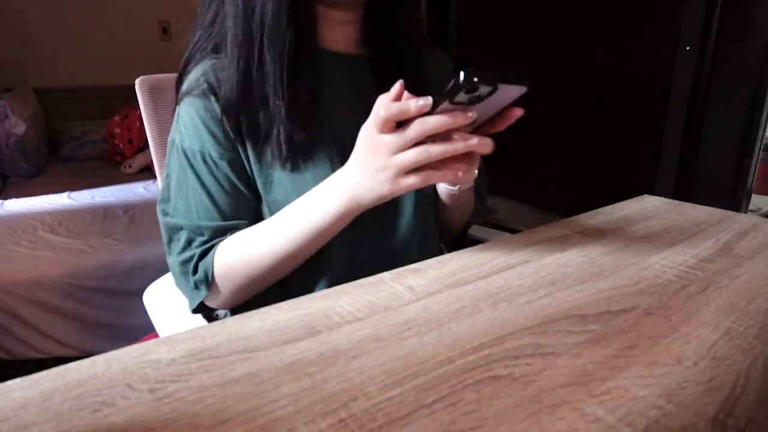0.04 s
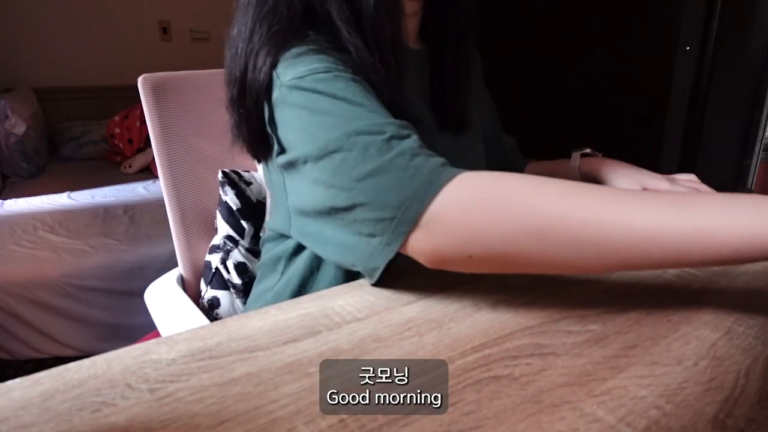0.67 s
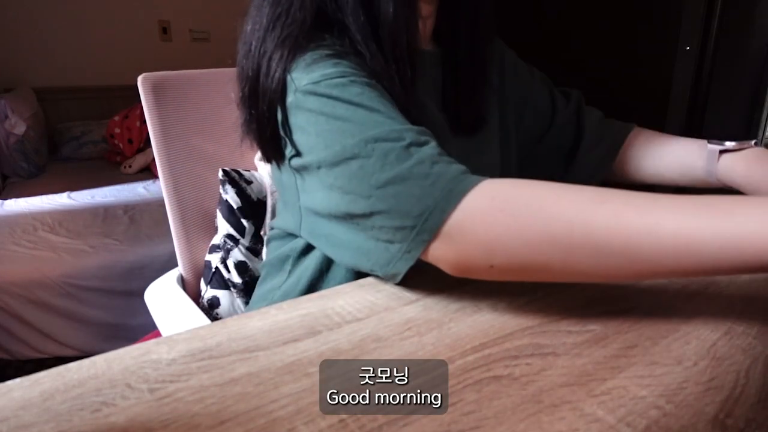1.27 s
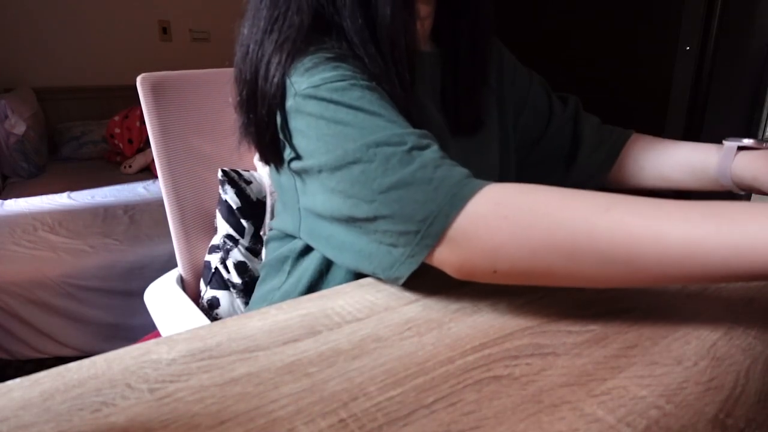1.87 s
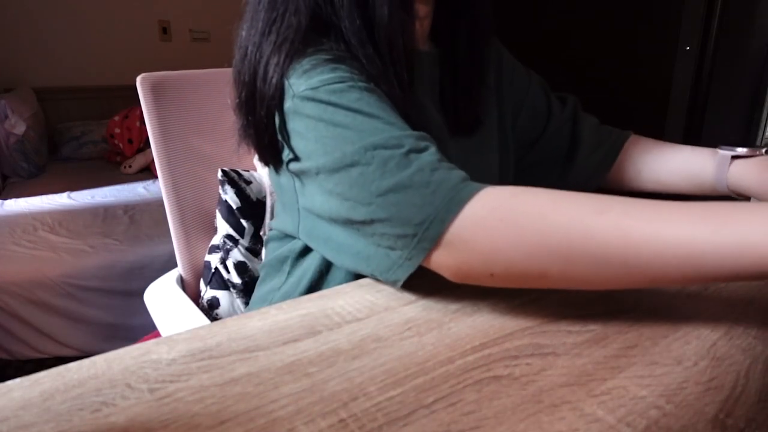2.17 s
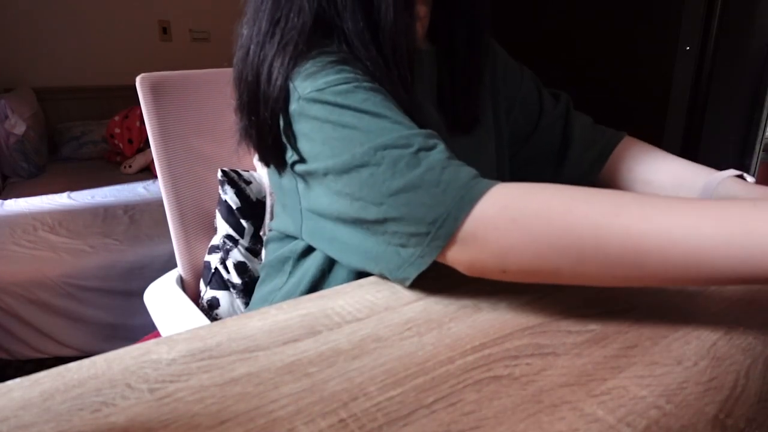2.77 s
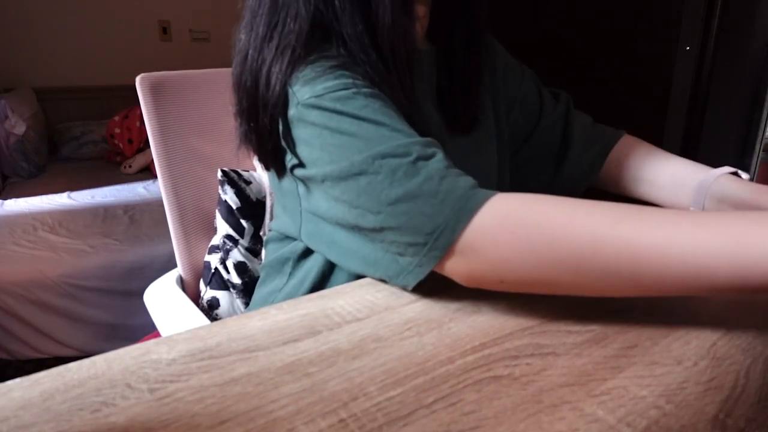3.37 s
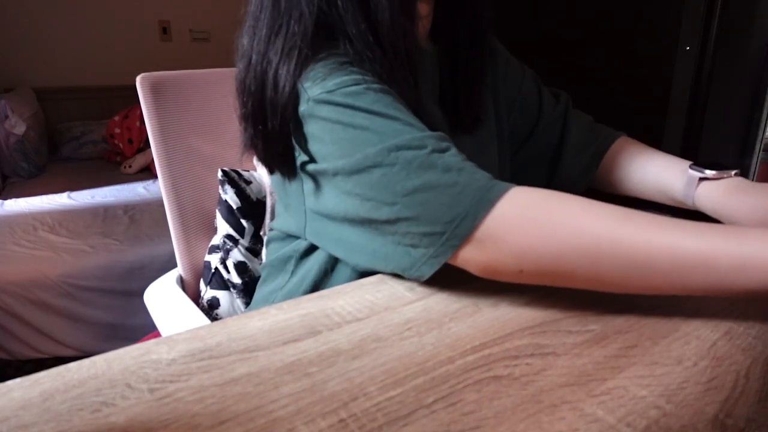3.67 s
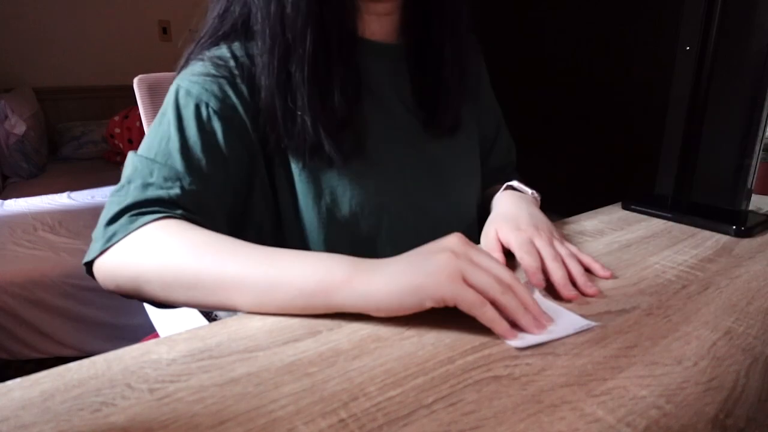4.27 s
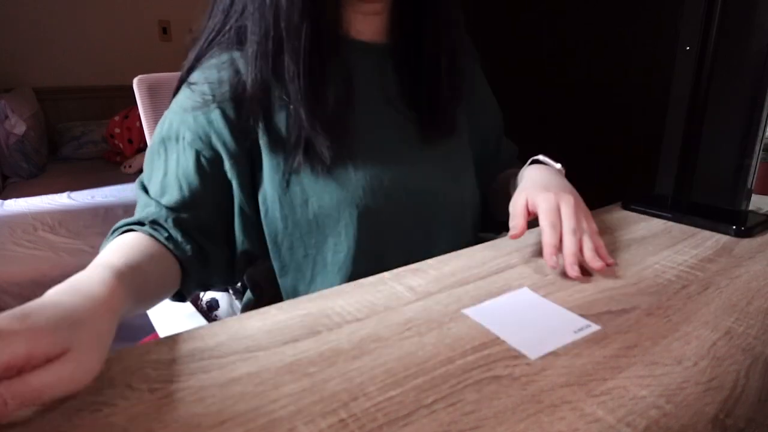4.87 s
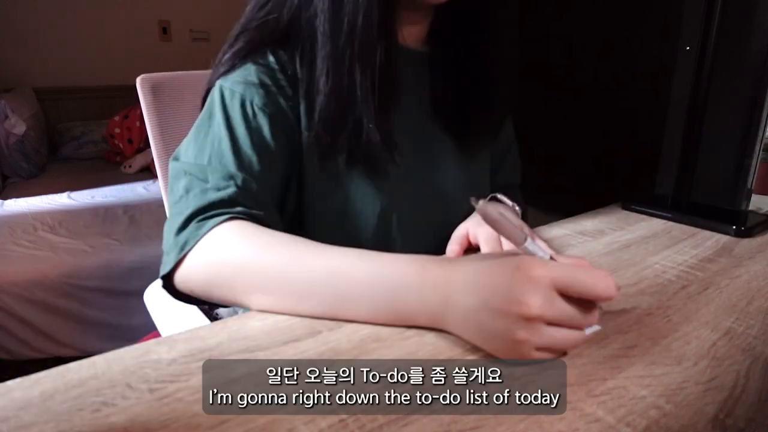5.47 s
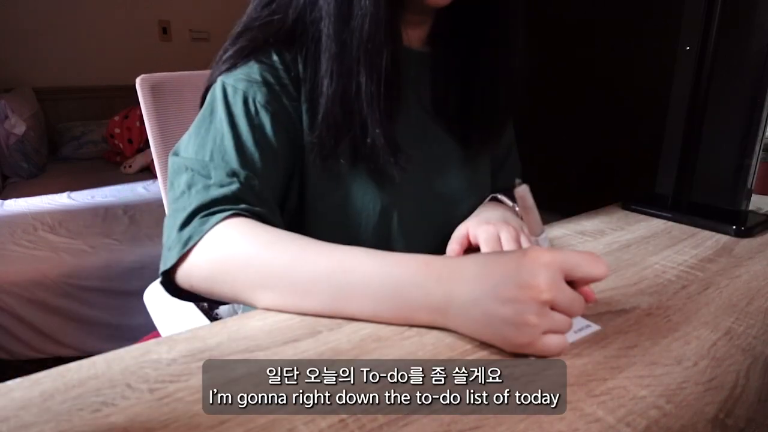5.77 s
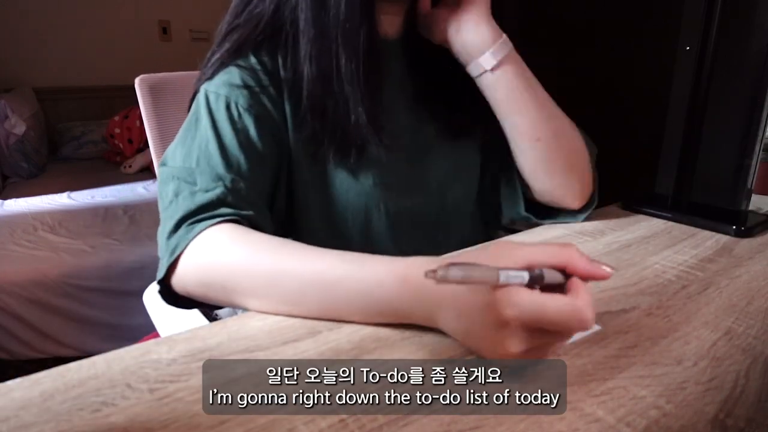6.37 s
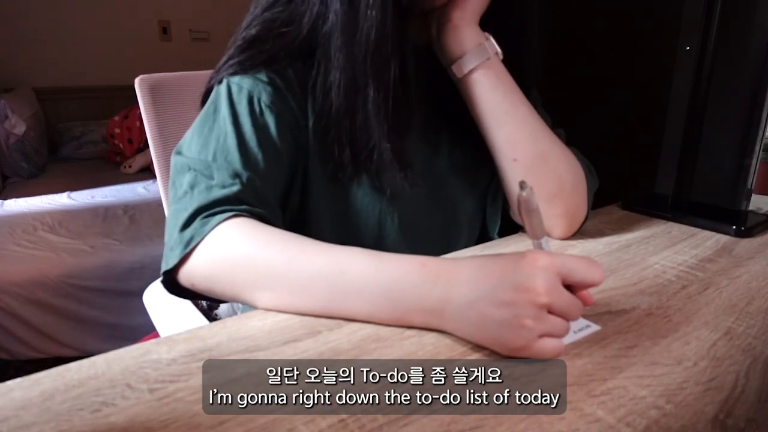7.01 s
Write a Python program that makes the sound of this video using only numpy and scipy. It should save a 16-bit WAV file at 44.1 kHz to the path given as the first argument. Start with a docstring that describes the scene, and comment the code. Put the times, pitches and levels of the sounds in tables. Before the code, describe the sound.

Close, quiet desk sounds: a phone set down, a sticky note peeled and smoothed flat, and a pen clicked, over rustling sleeves.

```python
"""A small quiet room: hands at a wooden desk, close to a stereo microphone with a little hiss.
A phone is put down, its case clicking and the board ringing under it. A sticky note is thumbed loose,
peeled off its pad as the glue lets go in tugs, slapped onto the desk and smoothed flat; its fibres
catch and slip and the sheet resonates. A pen clatters as it is picked up, then is clicked.
Sleeves rustle softly throughout, and a few faint thin tones come and go."""
import sys
import numpy as np
from scipy import signal
from scipy.fft import rfft, irfft, next_fast_len
from scipy.io import wavfile

SR = 44100
rng = np.random.default_rng(int(sys.argv[2]) if len(sys.argv) > 2 else 0)


def pcm_store(signal):
    """Save signal as 16-bit PCM."""
    levels = np.round(np.clip(np.atleast_2d(signal), -1, 1) * 32767)
    wavfile.write(sys.argv[1], SR, levels.astype(np.int16).T)


N = 319493
TIME = np.arange(N) / SR
SHORT = TIME[:8192]   # time axis of a one-shot

# colour of a hard edge hitting wood: f/Hz, level/dB
CRACK_COLOUR = [(100, -45), (600, -34), (1500, -10.5), (2500, -1.5), (4500, -2.5), (6000, -4),
                (11000, -7.5), (16000, -18.5)]
# the pen on the wood, a light rub and then clattering: t/s, level/dB
PEN_TOUCHES = [(4.827, -46), (4.8364, -28.5), (4.868, -42), (4.8738, -48), (4.8963, -31.5), (4.8996, -27.5)]
# the glue letting go in tugs: t/s, level/dB, length/s, sheet resonance/Hz
GLUE_TUGS = [(3.4467, -47, 0.02, 4700), (3.548, -44, 0.0067, 8500), (3.6615, -31, 0.00079, 7150),
             (3.699, -39.5, 0.004, 9600), (3.7075, -37, 0.0015, 4120), (3.712, -40.5, 0.0073, 3800),
             (3.7418, -39, 0.0012, 2680), (3.776, -35.5, 0.0095, 7340), (3.787, -44, 0.0067, 3900),
             (3.816, -33, 0.0061, 4800), (3.8315, -27, 0.0042, 4420), (3.8795, -33.5, 0.0135, 3900),
             (3.963, -48, .007, 4230)]


def from_db(db):
    return 10 ** (np.asarray(db) / 20)


def rms_one(x):
    return x / np.sqrt(np.mean(x ** 2) + 1e-20)


def in_time(rows):
    return np.interp(TIME, *np.transpose(rows))


def at_hz(points, hz):
    points_hz, values = np.transpose(points)
    return np.interp(np.log(hz + 1), np.log(points_hz), values)


def add(track, s, sound):
    """Mix a sound in at a given time."""
    start = max(round(s * SR), 0)
    track[start:start + len(sound)] += sound[:N - start]


def swell(start, end):
    """A smooth rise and fall."""
    return np.sin(np.linspace(0, np.pi, max(round((end - start) * SR), 8)))


def wander(per_s, count):
    """Random values joined by straight lines."""
    steps = rng.standard_normal(1024)
    return np.interp(TIME[:count] * per_s, np.arange(len(steps)), steps)


def filtered(x, order, hz, kind="low"):
    """A Butterworth low-, high- or band-pass."""
    return signal.sosfilt(signal.butter(order, hz, kind, fs=SR, output="sos"), x + 1e-18)


def resonance(x, hz, width_hz):
    """One resonance, unity gain at its peak."""
    r = np.exp(-np.pi * width_hz / SR)
    return signal.lfilter([1, 0, -1], [1, -2 * r * np.cos(2 * np.pi * hz / SR), r * r], x) * (1 - r * r) / 2


def coloured(x, colour, tilt_db=0, hinge_hz=1500):
    """Minimum-phase EQ with a tilt per octave above the hinge; white noise keeps its level."""
    size = 4096
    hz = np.arange(size // 2 + 1) * SR / size
    curve_db = at_hz(colour, hz) + tilt_db * np.log2(np.maximum(hz, hinge_hz))
    cepstrum = irfft(np.log(rms_one(from_db(curve_db))))
    cepstrum[1:size // 2] *= 2   # folded forward, so nothing rings ahead of an attack
    cepstrum[size // 2 + 1:] = 0
    return signal.fftconvolve(x, irfft(np.exp(rfft(cepstrum))))[:len(x)]


def diffuse(mid, side):
    """Sound from all around: two close capsules differ mainly in the treble."""
    # stereo width: f/Hz, side minus mid/dB
    width = [(400, -21), (1000, -11), (3000, -11), (8000, -7), (16000, -6.5)]
    size = next_fast_len(len(side))
    hz = np.arange(size // 2 + 1) * SR / size
    side = irfft(rfft(side, size) * from_db(at_hz(width, hz)), size)[:len(mid)]
    return np.array([mid + side, mid - side])


def tones(rows, width_hz):
    """Narrow bands of noise: wavering tones that fade in and out."""
    out = np.zeros(N)
    for start, end, hz, level_db in rows:
        fade = swell(start, end)
        tone = resonance(rng.standard_normal(SR), hz, width_hz)[-len(fade):]
        add(out, start, from_db(level_db) * rms_one(tone) * fade)
    return out


def burst(t60):
    """A dense wash of vibrations that dies away."""
    fade = np.exp(-np.log(1000) * SHORT / t60)
    wash = rng.standard_normal(len(SHORT)) * fade
    return wash * np.linalg.norm(fade) / np.linalg.norm(wash)


def struck(modes, scatter_db=1.0):
    """Decaying modes, with new strengths at every blow."""
    hz, level_db, t60 = np.transpose(modes)[:, :, None]
    strengths = from_db(level_db + scatter_db * rng.standard_normal(hz.shape))
    strengths *= rng.choice([-1, 1], hz.shape)
    fades = np.exp(-np.log(1000) * SHORT / t60)
    return np.sum(strengths * np.sin(2 * np.pi * hz * SHORT) * fades, axis=0)


def touch(spread_s, sharpness):
    """One hard contact: a sharp first touch and a dying chatter of tiny ones, even in colour."""
    lags = np.round(rng.uniform(.15, 1, (3, 1)) * spread_s * SR) + 1
    delays = np.exp(-2j * np.pi * lags * np.arange(len(SHORT) // 2 + 1) / len(SHORT))
    allpasses = (sharpness + delays) / (1 + sharpness * delays)
    return irfft(np.prod(allpasses, axis=0)) * np.sqrt(spread_s * SR / 2)


def hiss(level_db=-67):
    """The microphone's steady noise floor."""
    # colour of the hiss: f/Hz, level/dB
    colour = [(30, -62), (80, -28), (300, -10.5), (1000, -9), (1500, -14), (1900, -1), (3200, -6),
              (5000, -8.5), (7500, -12.5), (9500, -12), (16000, -21)]
    return from_db(level_db) * diffuse(*[coloured(noise, colour) for noise in rng.standard_normal((2, N))])


def faint_tones():
    """Thin tones come and go in the background."""
    # each tone: start/s, end/s, f/Hz, level/dB
    whines = [(0, .42, 5320, -66.5), (.68, 1.32, 3582, -62), (2.0, 2.6, 760, -75.5),
              (7.05, 7.352, 3950, -66)]
    return tones(whines, width_hz=13)


def room(x, gap_s=0.00049, build_s=0.0014):
    """Dense reflections of a small furnished room; the bass lingers longest."""
    # reverb time: f/Hz, T60/s
    decay = [(200, 0.39), (1000, 0.13), (4000, 0.22), (14000, 0.22)]
    edges_hz = np.geomspace(80, 18000, 9)
    t = TIME[:SR // 2]
    tail = np.zeros((2, len(t)))
    for low, high in zip(edges_hz, edges_hz[1:]):
        band = filtered(rng.standard_normal(tail.shape), 2, [low, high], "band")
        tail += band * np.exp(-np.log(1000) * t / at_hz(decay, np.sqrt(low * high)))
    tail *= 1 - np.exp(-np.maximum(t - gap_s, 0) / build_s)
    return signal.fftconvolve(x[None], diffuse(*tail) / np.linalg.norm(tail[0]), axes=1)[:, :N]


def sleeves(catches_per_s=60, crackle_db=-13, swish_db=-2, swells_per_s=5):
    """Cloth brushes along the arms, its colour shifting with the folds; now and then a thread catches."""
    # cloth moving with the arms: t/s, level/dB
    movement = [(0.0, -59.5), (.45, -57.5), (.85, -60), (1.83, -61), (2.2, -59), (2.66, -57.5),
                (3.34, -62.5), (3.61, -57.5), (3.77, -53.5), (3.97, -60.5), (4.36, -62), (5.46, -62),
                (5.68, -66), (6.55, -61.5), (7.24, -63.5)]
    # colour of rubbing cloth: f/Hz, level/dB
    cloth = [(100, -34.5), (400, -10), (1450, -21.5), (2000, -7), (3100, 3.5), (4500, -1.5), (16000, -16.5)]
    catches = (rng.random((2, N)) < catches_per_s / SR) * rng.standard_normal((2, N))
    brush = rng.standard_normal((2, N)) + from_db(crackle_db) * rms_one(catches)
    folds = rng.standard_normal((2, N))
    for hz in np.geomspace(2200, 9000, 12):
        brush += from_db(swish_db) * wander(swells_per_s, N) * resonance(folds, hz, width_hz=hz / 12)
    return from_db(in_time(movement)) * diffuse(*[rms_one(coloured(noise, cloth)) for noise in brush])


def board(cut_hz, build_s=0.00052, thud_hz=222, thud_width_hz=150):
    """A blow rings the desk's main modes, a wash of lesser ones and a thud; flesh reaches only the lows."""
    # main modes of the desk top: f/Hz, level/dB, T60/s
    modes = [(430.6, -7.5, 0.051), (471, -3, 0.058), (664, -3, 0.031), (784, 8, 0.018), (890, -0.5, 0.026),
             (1080, -5, 0.059), (1246, 1, 0.041), (1626, -6, 0.053), (1799, -7, 0.13), (2430, -4.5, 0.075),
             (2570, 10.5, 0.023), (3260, 6.5, 0.04)]
    # colour of its lesser modes: f/Hz, level/dB
    wood = [(60, -23), (160, -22), (240, -9), (350, -37), (460, -20), (550, -13), (660, -2), (1200, -9),
            (1450, -12), (1900, 9), (2800, 1), (5000, 9.5), (16000, -40)]
    wash = burst(t60=.085)
    ring = from_db(-2.5) * struck(modes) + from_db(3) * coloured(wash, wood)
    ring *= 1 - np.exp(-SHORT / build_s)   # bending waves take time to spread
    ring = filtered(ring, 2, thud_hz, "high")
    thud = resonance(resonance(wash, thud_hz, thud_width_hz), thud_hz, thud_width_hz)
    thud *= from_db(5) * (thud_hz / max(cut_hz, thud_hz)) ** 3   # the longer the push, the more it thuds
    return filtered(ring + thud, 4, cut_hz)


def knocks():
    """Phone, fingers and arms land on the desk and ring the board; a hard edge adds a crack."""
    # landings: t/s, wood/dB, contact cut-off/Hz (low for flesh, high for a hard edge), crack/dB
    blows = [(.44, -58, 1270, -37), (0.513, -46, 220, -75), (0.554, -40.5, 265, -41.5),
             (0.6747, -29.5, 2680, -17), (.749, -42, 520, -44), (2.749, -63, 1190, -43),
             (3.59, -41, 980, -65), (4.129, -51, 510, -76), (4.902, -40, 470, -68), (6.72, -51, 430, -73)]
    out = np.zeros(N)
    for s, wood_db, cut_hz, crack_db in blows:
        body = from_db(wood_db) * board(cut_hz)
        crack = from_db(crack_db) * coloured(touch(0.00081, sharpness=0.93), CRACK_COLOUR)
        add(out, s, body + crack)
    return out


def jolts(rows, cut_hz, passed_db=-25):
    """Whatever lies on the desk passes a share of each jolt to the board."""
    out = np.zeros(N)
    for s, level_db, *_ in rows:
        add(out, s, from_db(level_db + passed_db) * board(cut_hz))
    return out


def plastic_taps(rows, spread_s, gain_db):
    """Brief contacts on small, well damped plastic; each spot has a resonance of its own."""
    # colour of tapped plastic: f/Hz, level/dB
    plastic = [(100, -58), (1400, -31), (2500, -10.5), (4000, -5.5), (10200, -2.5), (11500, -4.5),
               (16000, -12.5)]
    out = np.zeros(N)
    for s, level_db, tilt_db in rows:
        contact = coloured(touch(spread_s, sharpness=0.75), plastic, tilt_db)
        ring = 2.2 * resonance(contact, hz=rng.uniform(3300, 10500), width_hz=600)
        add(out, s, from_db(level_db + gain_db) * (contact + ring))
    return out


def fingernails():
    """Nails tick lightly on things."""
    # nail contacts: t/s, level/dB, tilt/dB per octave
    ticks = [(1.0854, -43, -4), (1.466, -45, -7), (2.8195, -43, -4), (2.881, -46, -2), (3.184, -47, -7),
             (3.267, -43.5, -9), (3.5902, -32.5, -4), (3.7605, -47, 19), (4.199, -43, -4), (4.232, -44, -8),
             (6.6675, -45.5, -5)]
    return plastic_taps(ticks, spread_s=0.00095, gain_db=2.0)


def clicks():
    """The phone case and the pen's button click, short and bright."""
    # case and button contacts: t/s, level/dB, tilt/dB per octave
    contacts = [(.2263, -30, 15.5), (5.0639, -28.5, 12.5), (5.0761, -24.5, 6), (5.1243, -18.5, 9.5),
                (5.1745, -35, 8), (5.3052, -43.5, 4), (5.3688, -37, 14.5)]
    return plastic_taps(contacts, spread_s=0.00034, gain_db=3.5)


def pen_spring(start_s=5.126, level_db=-43, decay_s=0.033, hz=11500, width_hz=5000):
    """The pen's spring buzzes briefly as the button is let go."""
    out = np.zeros(N)
    buzz = resonance(resonance(rng.standard_normal(len(SHORT)), hz, width_hz), hz, width_hz)
    add(out, start_s, from_db(level_db) * rms_one(buzz) * np.exp(-SHORT / decay_s))
    return out


def pen_clatter(hollow_hz=870, rise_hz_per_s=1500):
    """The pen rocks on the desk: a clack at each touch, and a hollow note rising as the fingers close."""
    # modes of the pen: f/Hz, level/dB, T60/s
    modes = [(1300, -16, 0.02), (1950, 1, 0.008), (2250, -14, 0.011), (2770, -14, 0.037),
             (3200, -30, 0.062)]
    out = np.zeros(N)
    for s, level_db in PEN_TOUCHES:
        hollow_mode = (hollow_hz + rise_hz_per_s * (s - PEN_TOUCHES[0][0]), -6, 0.016)
        contact = coloured(touch(0.00091, sharpness=0.93), CRACK_COLOUR)
        clack = contact + from_db(17) * resonance(contact, hz=2150, width_hz=1100)
        add(out, s, from_db(level_db) * (struck(modes + [hollow_mode]) + from_db(-7) * clack))
    return filtered(out, 4, 720, "high")


def crinkle(count, grain, cracks_per_s=1100, spread_db=3.5):
    """Paper friction: a soft hiss shot through with fibres cracking in uneven sizes."""
    sizes = from_db(spread_db * np.minimum(rng.exponential(1, SR), 3)) * rng.choice([-1, 1], SR)
    cracks = rms_one((rng.random(SR) < cracks_per_s / SR) * sizes)
    return rms_one(rng.standard_normal(SR) + 2 * grain * cracks)[:count]


def sheet(force, hz, ring_db=3, q=6, gain_db=-3, neutral_hz=6500):
    """The free part of the paper resonates: the shorter it is held, the higher and brighter."""
    # colour of sliding paper: f/Hz, level/dB
    paper = [(100, -38), (700, -31.5), (1500, -24), (2200, -8), (3300, -4), (5500, 0.5), (13000, -0.5),
             (16000, -7.5)]
    sound = from_db(gain_db) * coloured(force, paper, tilt_db=3 * np.log2(hz / neutral_hz))
    return sound + from_db(ring_db) * resonance(sound, hz, hz / q)


def over_desk(paper, share=0.3):
    """The back of the sheet sounds in opposite phase and bounces off the desk: a shifting hollow colour."""
    # lag of the bounce, following the sheet's height: t/s, delay/s
    lag = [(3.55, 0.00034), (3.75, 0.00042), (3.9, 0.00041), (4.3, 0.00018), (4.34, .00017)]
    bounce = np.interp(TIME - in_time(lag), TIME, paper)
    return (paper - share * bounce) / np.hypot(1, share)


def squeaks():
    """Paper and glue squeak in short, wavering notes."""
    # each squeak: start/s, end/s, f/Hz, level/dB
    notes = [(3.17, 3.5, 7700, -63.5), (3.2, 3.42, 7080, -64), (3.71, 3.742, 820, -59.5),
             (3.777, 3.796, 3864, -33.5), (4.28, 4.4, 3260, -56.5)]
    return tones(notes, width_hz=100)


def strokes(slips_per_s=500, slip_db=5):
    """Fibres catch and slip: a smooth hiss when the sheet lies flat, grains and crackles when it bends."""
    # fingers and paper sliding, with the phone scuffing at first and a sleeve brushing at the end: start/s,
    # end/s, level/dB, resonance/Hz, graininess/0-1, resonance/dB
    slides = [(0.223, 0.27, -47.5, 2330, 0.2, 7), (2.162, 2.219, -51, 4760, 0.7, 4),
              (2.339, 2.378, -41, 8850, 0.1, -19), (2.466, 2.563, -50, 10500, 0.5, -2),
              (2.51, 2.529, -48.5, 11500, 0.71, 6), (2.582, 2.725, -54.5, 9850, 0.2, 2.5),
              (3.328, 3.48, -47, 7350, 0.54, -4.5), (3.426, 3.593, -45.5, 9900, 0.75, -9),
              (3.585, 4.02, -46.5, 5300, 0.7, -22), (3.637, 3.687, -44.5, 4800, 0.54, 3.5),
              (4.208, 4.36, -50, 5240, 0.36, 6), (4.314, 4.34, -36.5, 8800, .7, 1),
              (4.33, 4.367, -40.5, 8500, 0.9, 9), (4.376, 4.41, -36, 8850, 1, 4),
              (4.483, 4.628, -48, 9200, 0.2, -4.5), (4.6, 4.821, -50.5, 8900, 0.1, -7),
              (5.441, 5.562, -65, 4600, 0.4, 10.5)]
    out = np.zeros(N)
    for start, end, level_db, hz, grain, ring_db in slides:
        pressure = swell(start, end)
        grip = rms_one(from_db(slip_db * grain * wander(slips_per_s, len(pressure))))
        friction = crinkle(len(pressure), grain) * grip * pressure
        add(out, start, from_db(level_db) * sheet(friction, hz, ring_db, q=3.1))
    return out


def snaps(rows, band_hz, rustle_db, lead_s, trail_s, release_s, rise_s=0.00016, slips_per_s=900):
    """The sheet rustles as it is strained, gives way suddenly, then rustles to rest."""
    out = np.zeros(N)
    preroll_s = .08
    t = SHORT - preroll_s
    for s, level_db, length_s, hz in rows:
        give = np.clip(t / rise_s, 0, 1) * np.exp(-np.maximum(t - length_s, 0) / release_s)
        grip = rms_one(from_db(3 * wander(slips_per_s, len(t))))
        rustle = from_db(rustle_db) * np.exp(np.minimum(t / lead_s, -t / trail_s)) * grip
        friction = crinkle(len(t), grain=0.37) * (give + rustle)
        add(out, s - preroll_s, from_db(level_db) * sheet(friction, hz))
    return filtered(out, 1, band_hz, "band")


def thumbing(flick_s=0.0056):
    """The thumb flicks over the edge of the pad to loosen the note."""
    # flicks: t/s, level/dB, sheet resonance/Hz
    flicks = [(2.148, -41, 4660), (2.225, -42, 4750), (2.314, -51, 7000), (2.3815, -37.5, 8200),
              (2.555, -48, 4630), (2.566, -46.5, 4540)]
    rows = [(s, level_db, flick_s, hz) for s, level_db, hz in flicks]
    return snaps(rows, band_hz=[3500, 19000], rustle_db=-6, lead_s=0.0063, trail_s=0.035, release_s=0.0044)


def peeling():
    """The note comes off the pad tug by tug, each a dry snap."""
    return snaps(GLUE_TUGS, band_hz=[1200, 11700], rustle_db=-16,
                 lead_s=0.0073, trail_s=0.008, release_s=0.00051)


def slaps(spread_s=0.00079, top_hz=10500, flap_hz=3310, flap_q=8, flap_db=10):
    """The note meets the wood in a few hard touches, each of which also sets the whole sheet flapping."""
    # slapped down, then its edge pressed home: t/s, level/dB, sheet resonance/Hz
    touches = [(4.2979, -16, 7030), (4.2998, -24.5, 7400), (4.3973, -30, 9500), (4.3974, -32, 9600)]
    out = np.zeros(N)
    for s, level_db, hz in touches:
        contact = touch(spread_s, sharpness=0.66)
        add(out, s, from_db(level_db) * sheet(contact, hz, ring_db=4, q=11, gain_db=3.5))
    out = filtered(out, 1, top_hz)
    return out + from_db(flap_db) * resonance(out, flap_hz, flap_hz / flap_q)


def placed(x, shadow_hz=1300):
    """The far capsule is shaded in the treble only; the bass stays in the middle."""
    # where the hands work: t/s, left minus right/dB
    pan = [(.2, -1.5), (.67, -1), (2.2, -4), (3.85, -4), (4.3, -1.5), (4.7, -2.5), (5.06, 0)]
    bass = filtered(x, 1, shadow_hz)
    return bass + (x - bass) * from_db(in_time(pan) * np.array([[.5], [-.5]]))


def scene(glance_s=0.001, glance_db=-4):
    """Desk, pen and paper sound close by; the room and the hiss surround them."""
    desk = knocks() + jolts(PEN_TOUCHES, cut_hz=410) + jolts(GLUE_TUGS, cut_hz=4600)
    plastic = fingernails() + clicks() + pen_spring()
    pen = pen_clatter()
    paper = over_desk(thumbing() + peeling() + slaps() + strokes()) + squeaks()
    near = desk + pen + plastic + paper
    # a first bounce reaches the two capsules unequally
    glance = from_db(glance_db) * np.roll(near, round(glance_s * SR))
    reverb = room(from_db(-4) * desk + from_db(-6) * (pen + plastic) + from_db(-8.5) * paper)
    return hiss() + sleeves() + faint_tones() + placed(diffuse(near, glance) + reverb)


def record(dry, low_cut_hz=130, top_hz=15900):
    """The microphone thins the bass; the top is cut steeply."""
    thin = filtered(dry, 2, low_cut_hz, "high")
    return signal.sosfilt(signal.ellip(10, .1, 80, top_hz, fs=SR, output="sos"), thin)


dry = scene()
out = record(dry)
pcm_store(out)
```